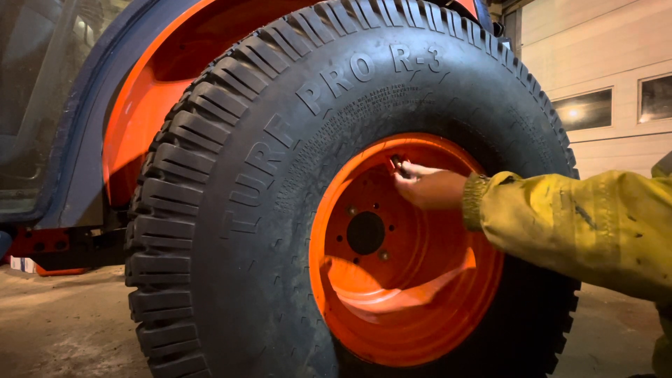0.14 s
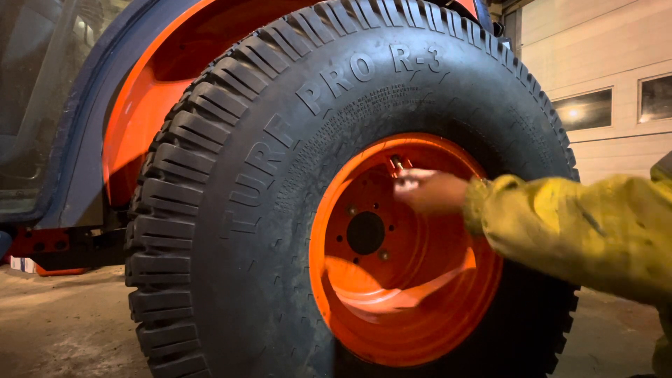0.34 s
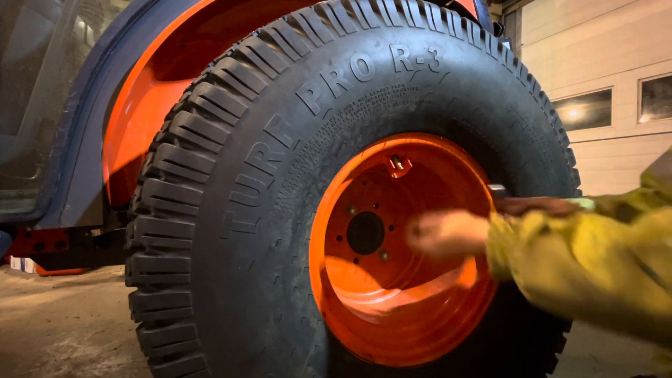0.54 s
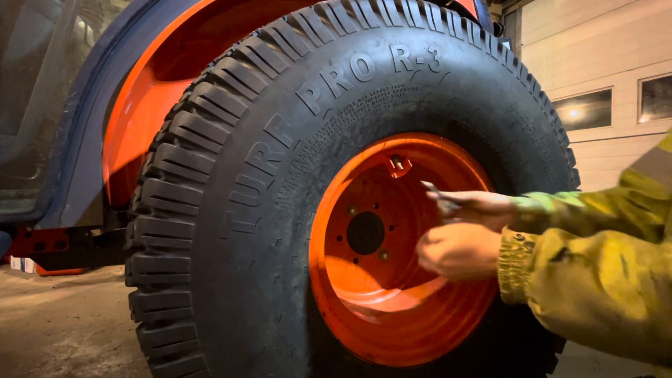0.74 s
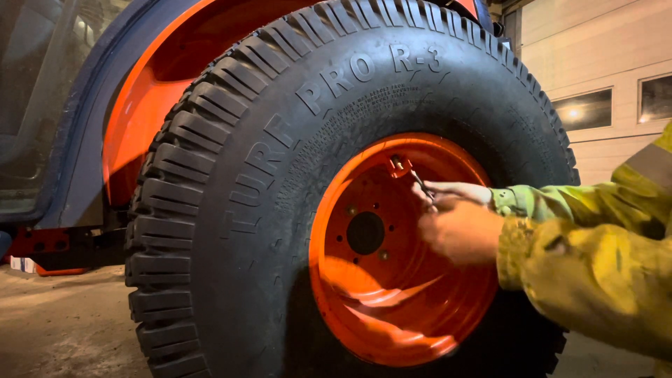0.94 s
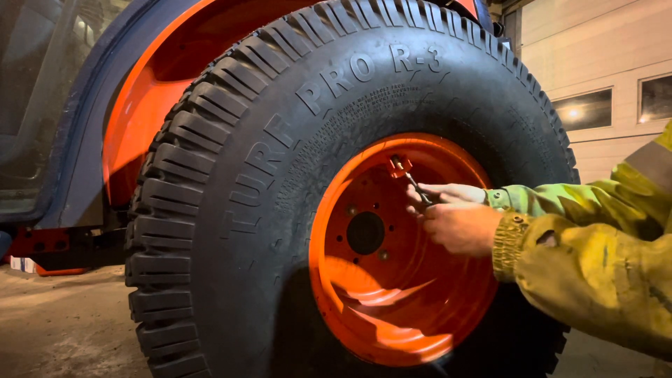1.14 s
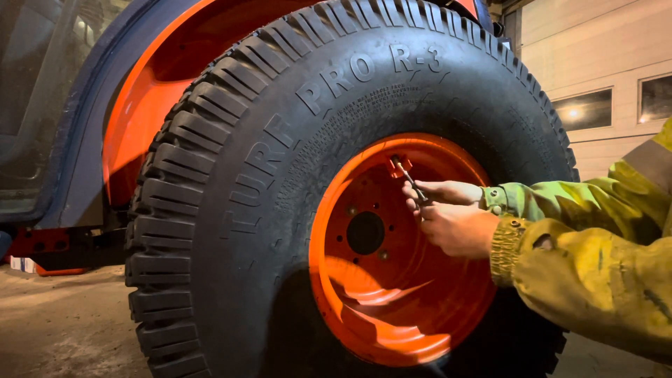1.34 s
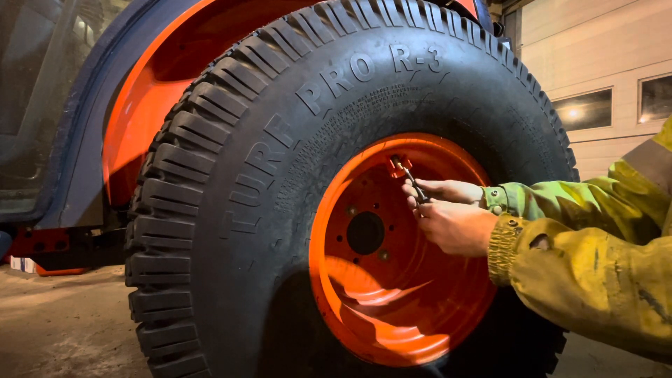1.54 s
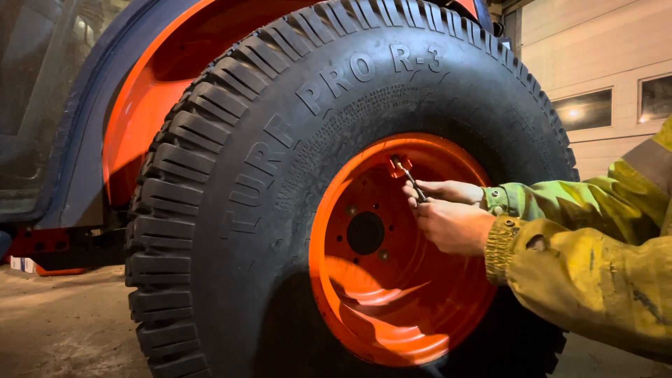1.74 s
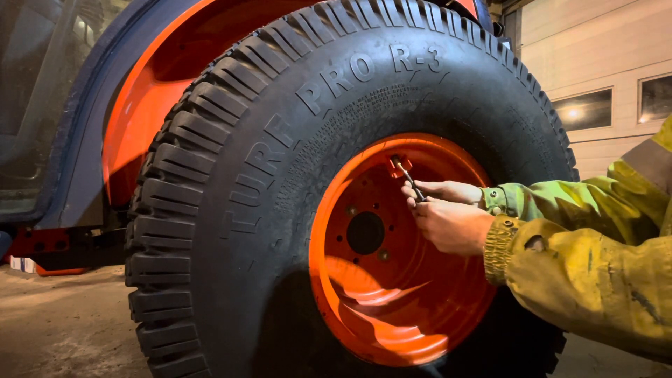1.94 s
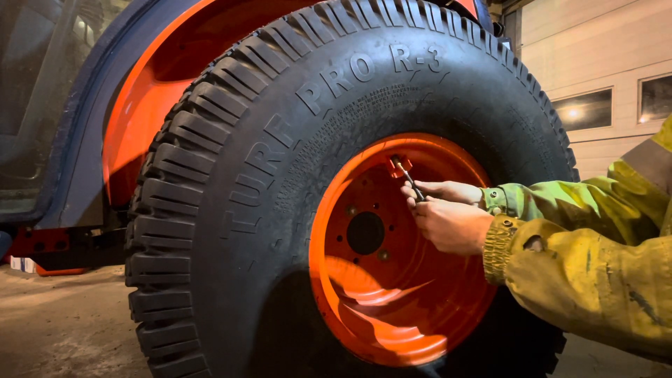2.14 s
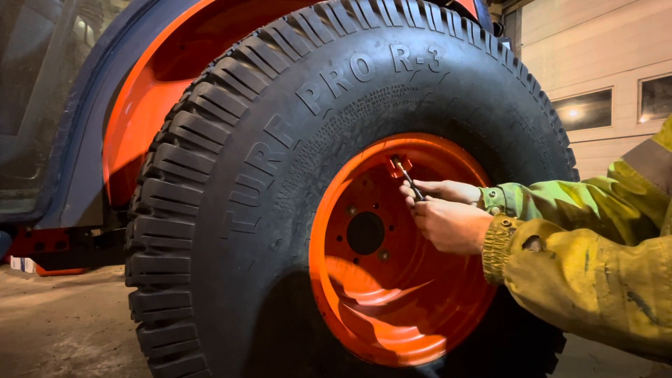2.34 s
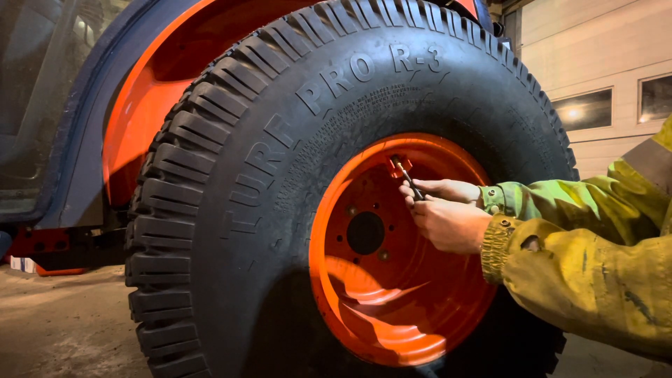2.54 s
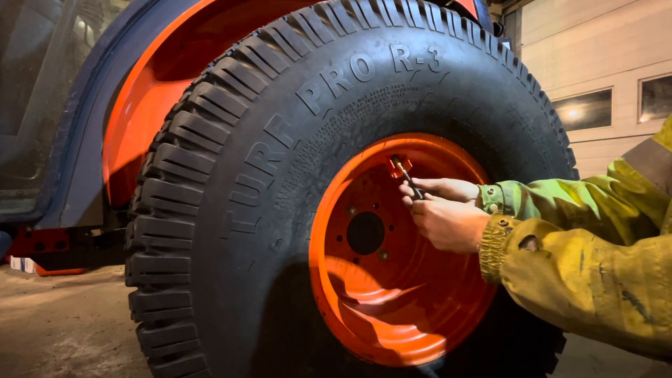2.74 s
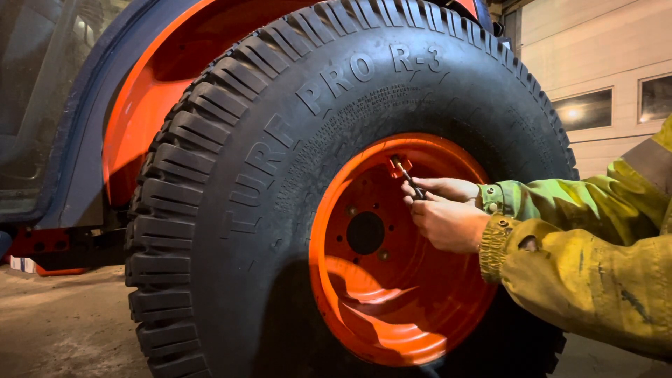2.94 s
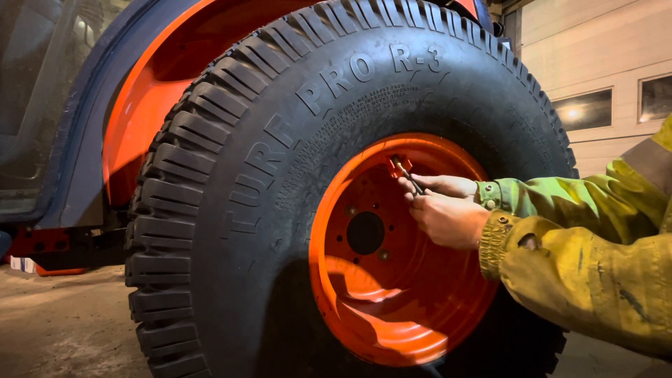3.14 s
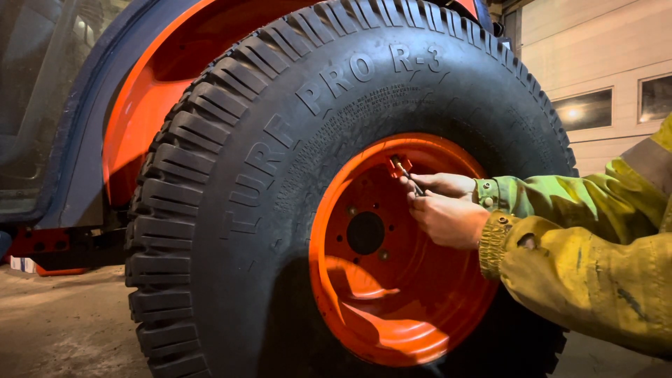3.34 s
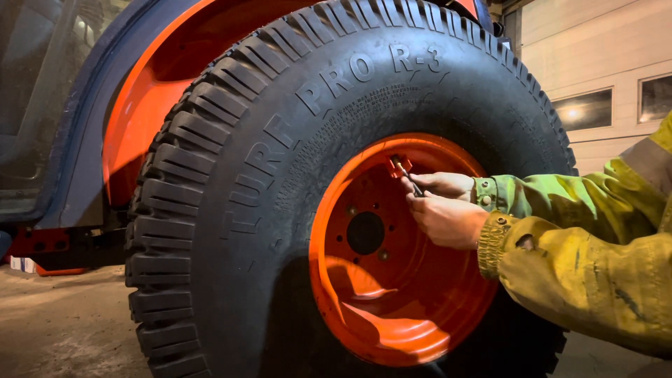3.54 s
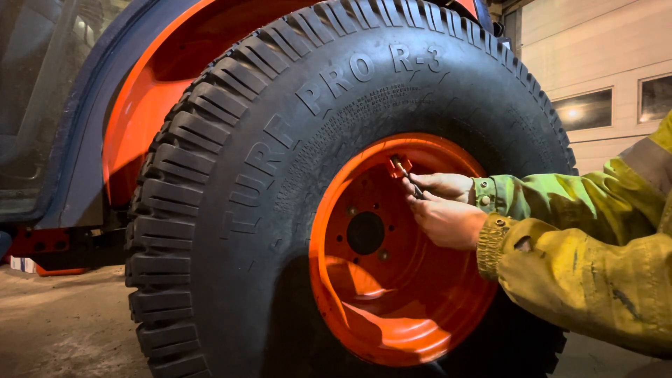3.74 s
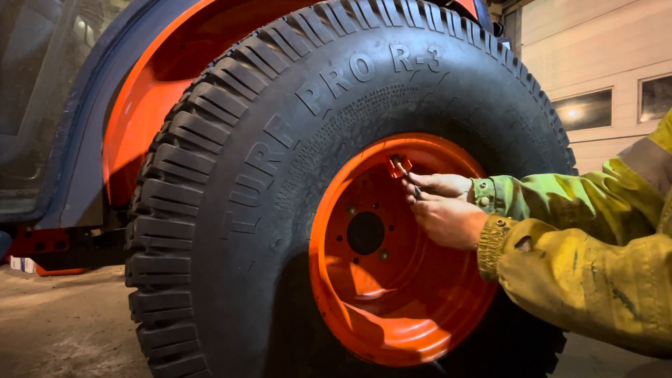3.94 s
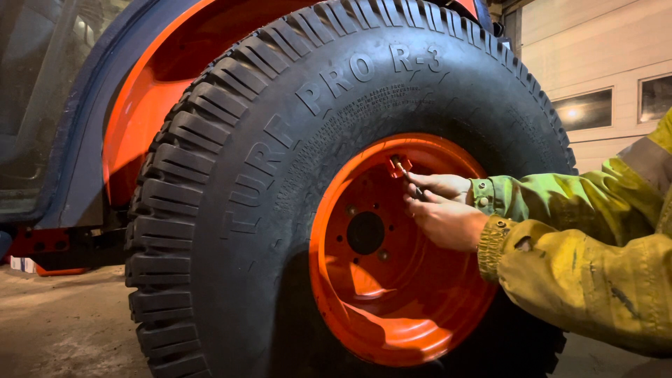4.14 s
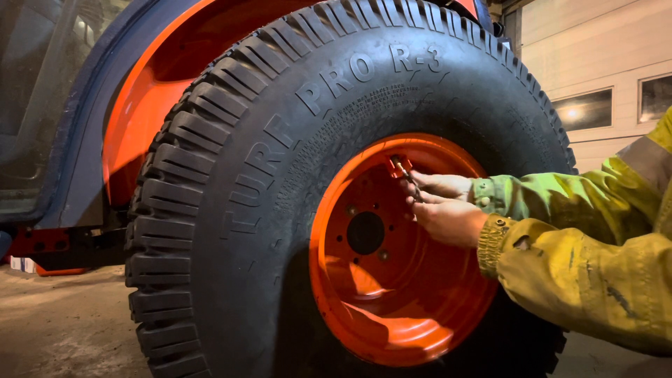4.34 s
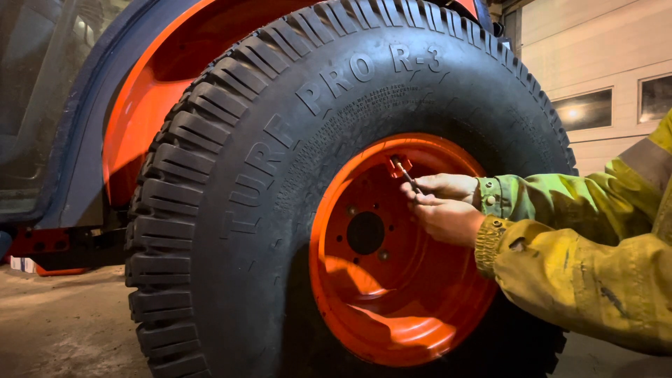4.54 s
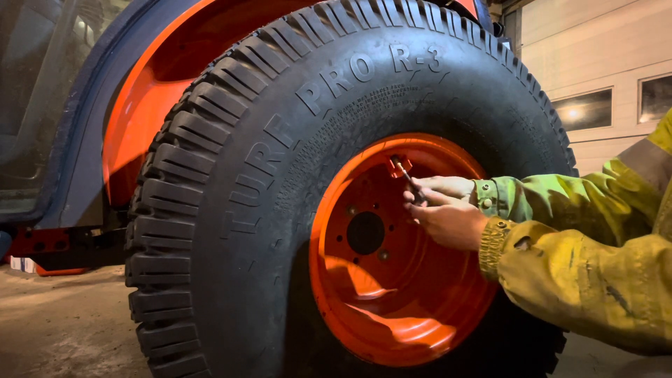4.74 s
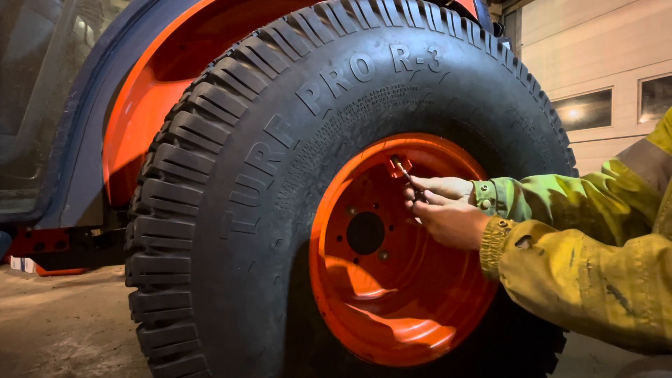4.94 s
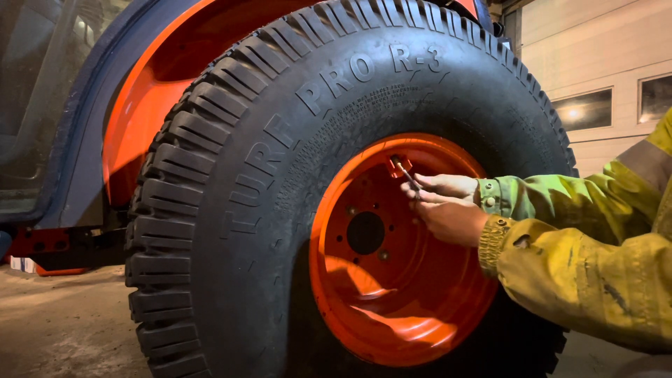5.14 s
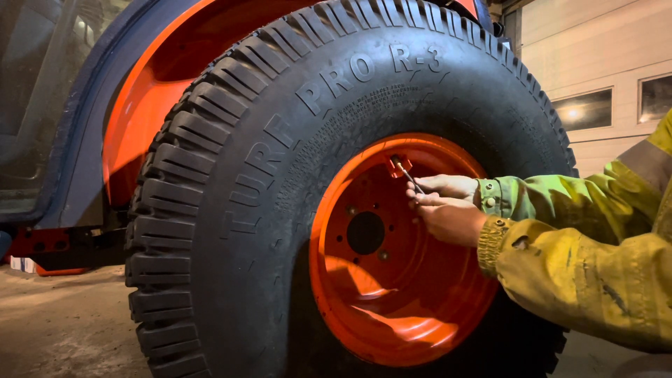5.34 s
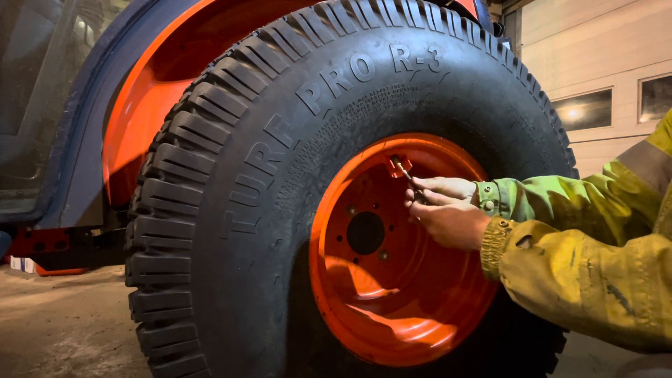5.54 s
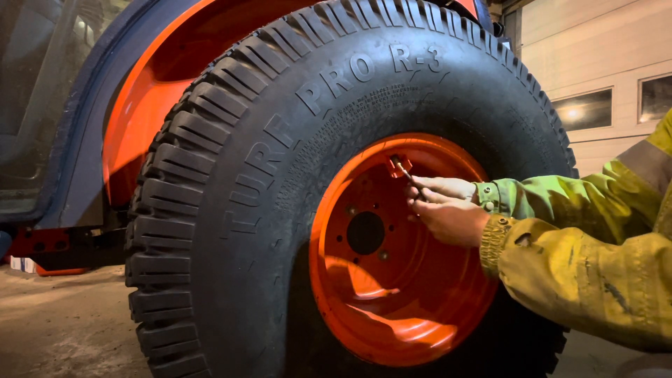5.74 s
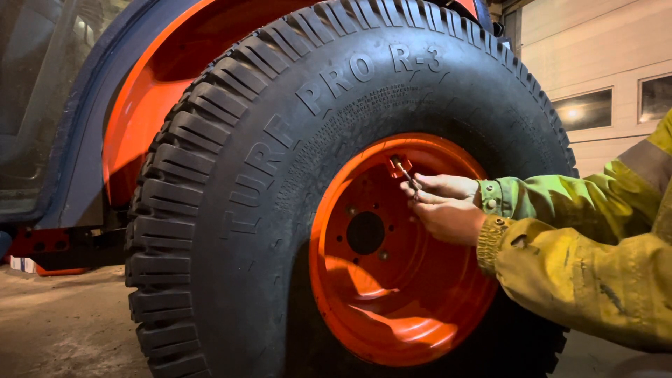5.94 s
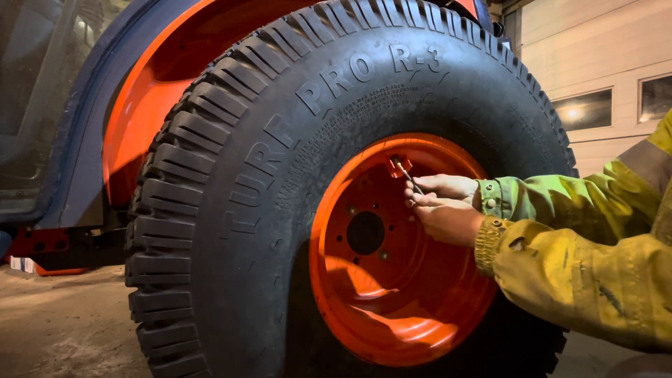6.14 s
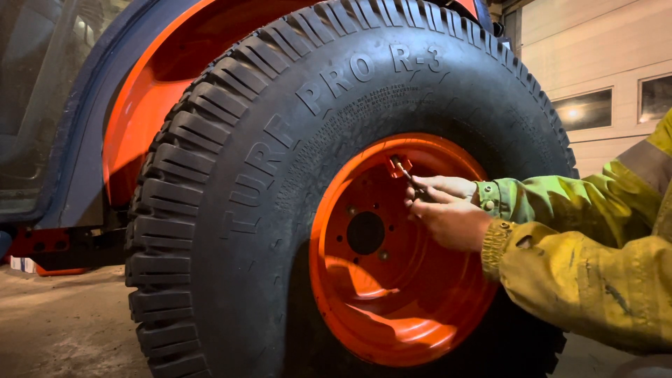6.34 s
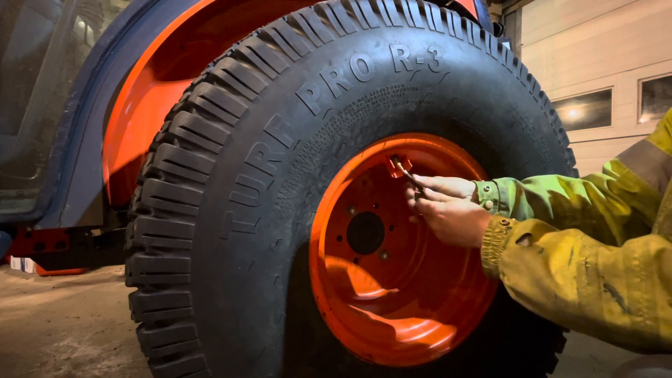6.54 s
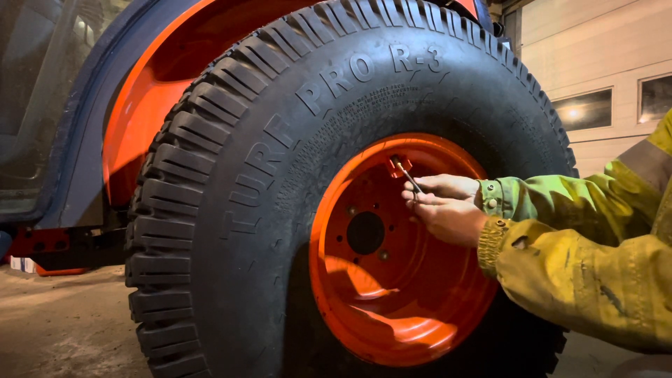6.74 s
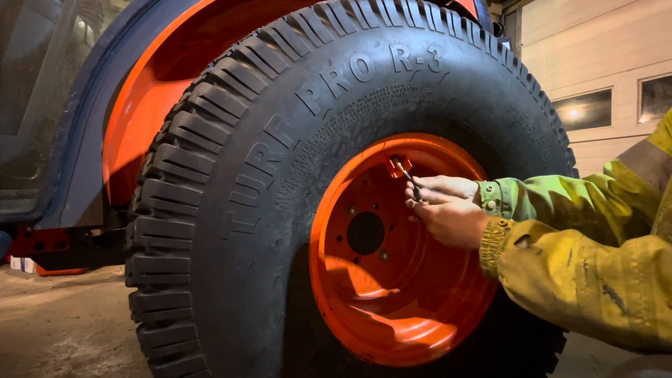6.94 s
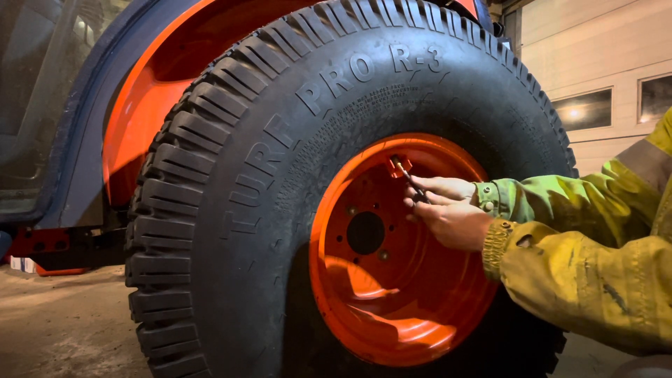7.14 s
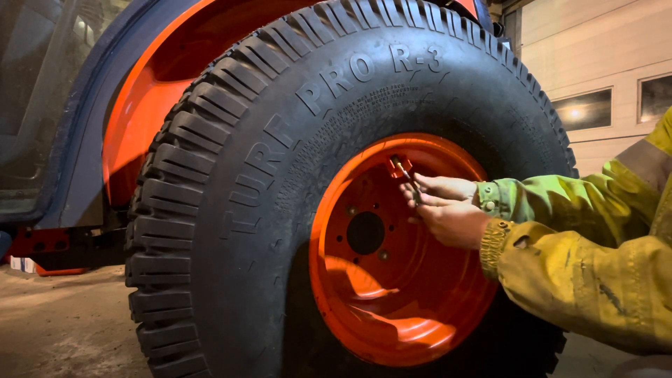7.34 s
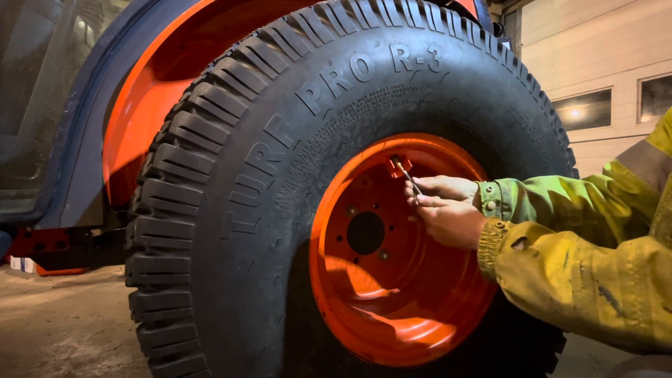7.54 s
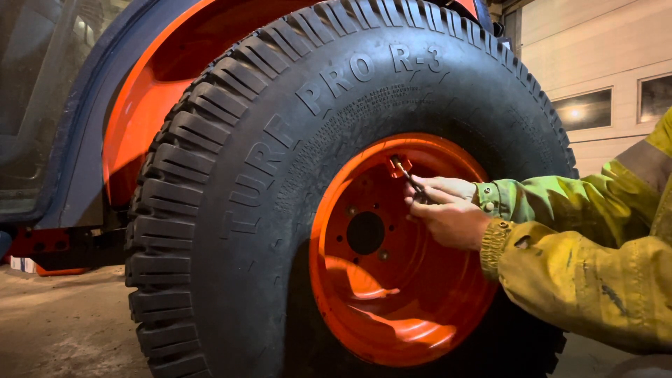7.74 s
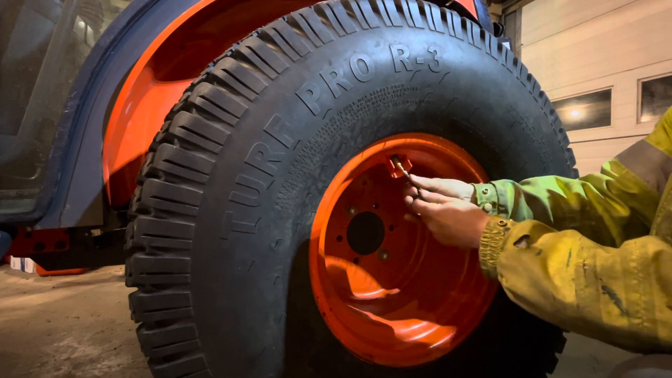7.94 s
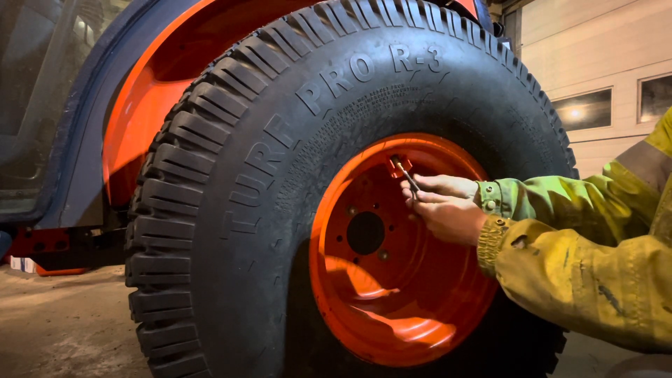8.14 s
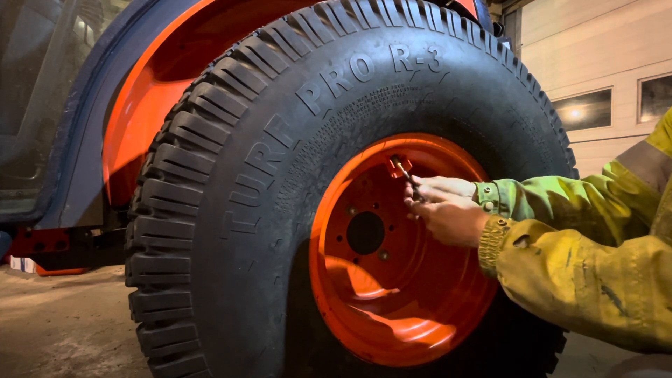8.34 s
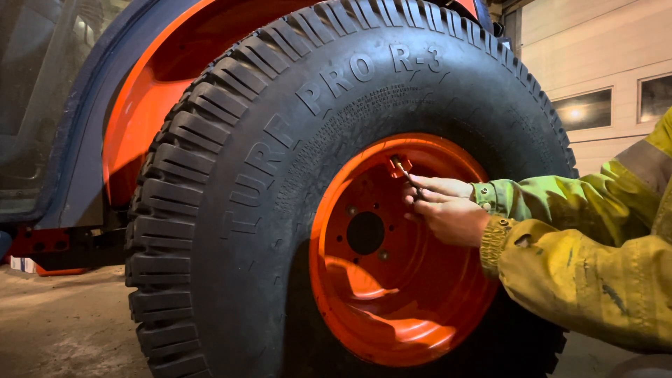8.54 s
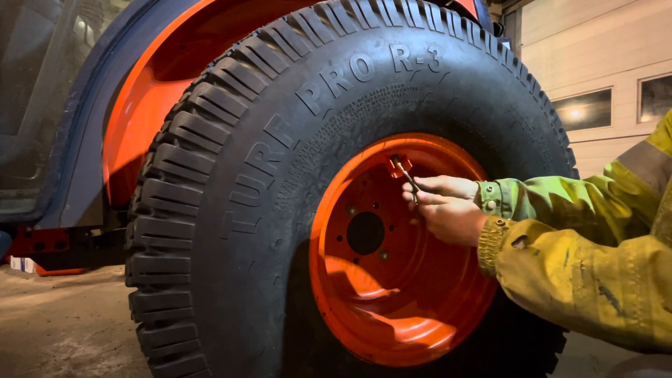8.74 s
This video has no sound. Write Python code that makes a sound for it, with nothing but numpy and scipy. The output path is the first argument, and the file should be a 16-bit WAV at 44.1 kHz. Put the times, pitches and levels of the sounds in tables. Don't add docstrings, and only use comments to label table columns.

```python
import sys
import numpy as np
from scipy import signal
from scipy.fft import rfft, irfft
from scipy.io import wavfile
from scipy.ndimage import uniform_filter1d

SR = 44100
rng = np.random.default_rng(int(sys.argv[2]) if len(sys.argv) > 2 else 0)


def volts_from_db(level):
    exponent = np.asarray(level, float) / 20
    return 10 ** exponent


def waveform_to_disk(signal):
    frames = np.transpose(np.atleast_2d(signal))
    scaled = np.clip(frames, -1, 1) * 32767
    samples = np.round(scaled).astype(np.int16)
    wavfile.write(sys.argv[1], SR, samples)


N = 391608
SECONDS = np.arange(N) / SR


def evened(x):
    return x / np.sqrt(np.mean(x ** 2) + 1e-20)


def read(points, hz):
    f, value = np.transpose(points)
    return np.interp(np.log(hz + 1), np.log(f + 1), value)


def band(x, lo_hz, hi_hz):
    hz = np.fft.rfftfreq(N, 1 / SR) + 1
    mask = 1 / np.sqrt((1 + (lo_hz / hz) ** 16) * (1 + (hz / hi_hz) ** 16))
    out = irfft(rfft(x) * mask, N)
    return out / np.sqrt(np.mean(out.mean(0) ** 2))


def noise(colour_db, same, lead, sideways_db, patchy_db, size):
    frames, bins = 4 * N // size + 5, size // 2 + 1
    a, b, c, d, patches = rng.standard_normal((frames, bins, 5)).T
    patches = uniform_filter1d(patches, bins // 30, axis=0)
    patches = evened(uniform_filter1d(patches, 12, axis=1))
    same = np.clip(same, -1, 1)[:, None]
    left = a + 1j * b
    right = same * left + np.sqrt(1 - same ** 2) * (c + 1j * d)
    right = right * np.exp(-1j * lead)[:, None]
    tilt = volts_from_db(sideways_db / 2)[:, None]
    z = np.array([left * tilt, right / tilt])
    z *= volts_from_db(colour_db[:, None] + patchy_db * patches)
    return signal.istft(z, nperseg=size, noverlap=3 * size // 4)[1][:, :N]


LAYER_EDGES_HZ = [7200, 3800, 1300]
# f/Hz, level/dB (per Hz)
JET_COLOUR = [(170, -17), (225, -30.5), (260, -8), (1200, -12.5), (1600, -6.5), (3200, -4), (5000, -8.5),
              (6300, -2.5), (8500, 0), (10500, 3), (12800, -3.5), (15500, -0.5), (15730, 10.5),
              (15850, -61)]
# f/Hz, width/Hz, level/dB
DISH = [(296, 12, -7.5), (628, 25, 2.0), (887, 41, 3.0), (1231, 36, 3), (1579, 116, -2.5),
        (2028, 110, -3.0), (2388, 68, -0.5), (2740, 190, -3.5), (3490, 20, -12), (3980, 41, -0.5),
        (4402, 60, 0), (4786, 37, 0.0), (5190, 120, -2), (5620, 73, 4.5), (6120, 49, -0.5),
        (6500, 84, -2.5), (6850, 21, -1.5), (7600, 48, -0.5), (8160, 90, -1.0), (8465, 56, 0.5),
        (8980, 48, -1.0), (9770, 39, -1.5), (10930, 47, -13.5)]
# f/Hz, likeness (0-1)
JET_SAME = [(150, 4.1), (280, 0.95), (600, 0.67), (1800, 0.81), (3300, 0.62), (4150, 0.33), (5000, 1),
            (5600, 0.6), (6200, 0.4), (9000, .5), (10400, 0.7)]
# f/Hz, lead/rad
JET_LEAD = [(4900, 0.), (5600, -2.5), (6600, -1.27), (8000, 0.96), (9150, 1.5), (9800, 1.7)]
# f/Hz, level/dB
JET_SIDEWAYS = [(150, 3), (280, -4.5), (600, -0.5), (2000, 0.1), (5000, 4.5), (7300, 1), (8300, -0.5),
                (9300, -10.5), (10600, -1)]
# f/Hz, likeness (0-1), lead/rad
JET_TOP = [(11000, .96, 0), (12700, .95, 0), (13300, .4, -1.5), (13900, .975, -np.pi),
           (15100, .975, -np.pi), (15500, .93, -np.pi), (15800, .93, -np.pi)]
HOLLOW_HZ = (1520, 1630)


def jet():
    hz = np.fft.rfftfreq(1024, 1 / SR)
    dish_db = sum((db + 10) / (1 + (2 * (hz - f) / w) ** 2) for f, w, db in DISH)
    same = read(JET_SAME + [(f, likeness) for f, likeness, _ in JET_TOP], hz)
    same += 0.034 * (dish_db - 5) * (hz < 10000)
    lead = read(JET_LEAD + [(f, angle) for f, _, angle in JET_TOP], hz)
    sideways_db = read(JET_SIDEWAYS + [(JET_TOP[0][0], 0)], hz)
    colour_db = read(JET_COLOUR, hz) + dish_db
    air = noise(colour_db, same, lead, sideways_db, patchy_db=0.96, size=1024)

    flutter_db = 0.25 * evened(uniform_filter1d(rng.standard_normal((4, N)), 300, axis=1))
    *gains, hollow = airflow()
    out = hollow * band(air, *HOLLOW_HZ)
    edges = [SR / 2, *LAYER_EDGES_HZ, 1]
    for gain, flutter, hi, lo in zip(gains, flutter_db, edges, edges[1:]):
        out += gain * volts_from_db(flutter) * band(air, lo, hi)
    opened = np.clip((SECONDS - 2.958) / 0.0063, 0, 1)
    return opened * out


def holds(t, start, length, db, sag_db):
    rise_s, release_db_per_s = 0.041, 199
    since = t[:, None] - start
    level_db = db + sag_db * np.clip(since / length, 0, 1)
    level_db = level_db - release_db_per_s * np.maximum(since - length, 0)
    return (np.clip(since / rise_s, 0, 1) * volts_from_db(level_db) ** 2).sum(1)


# t/s, level/dB
FLOW = [(2.95, -32.5), (3.17, -31.5), (3.3, -35.5), (3.5, -34.5), (3.67, -32.5), (3.85, -33), (3.98, -32.5),
        (4.64, -32), (4.71, -30.5), (5.15, -30.5), (5.35, -32), (5.5, -28.5), (5.95, -31.5), (6.05, -32.5),
        (7.12, -33), (7.45, -31.5), (7.7, -33), (8.88, -31.5)]
OPEN_LAG_S = [0, .004, .012, .014]
SHARE_DB = [-0.5, -9, -15.5, -21]
# middle t/s, length t/s, loss level/dB
PINCHES = [(5.092, 0.046, -3), (5.843, 0.067, -10), (5.895, 0.043, -3.5), (6.033, 0.085, -2.5),
           (6.597, 0.077, -5.5), (7.352, 0.077, -14.5), (8.061, 0.065, -2.5), (8.2, 0.029, -0.5),
           (8.282, 0.063, -2.5), (8.42, 0.035, -2), (8.773, 0.046, -4), (8.885, 0.074, -9)]
PINCH_DEPTH = [1.07, 0.69, 1.24, 1.25]
# start t/s, length t/s, on tool level/dB, on fingers level/dB, sag/dB
STRIKES = [(2.979, 0.53, -31.5, -39.5, -9.5), (3.53, 0.12, -49, -38, -22), (3.712, 0.14, -52, -45.5, 2),
           (3.85, 0.061, -43, -48.5, -3), (3.912, 0.087, -65, -43, -4), (4.244, 0.14, -68, -48.5, 7),
           (4.343, 0.1, -39.5, -56, 3), (4.434, 0.12, -38, -46.5, -11), (4.596, 0.077, -52, -42, 0),
           (4.694, 0.057, -35, -51, -7), (5.0, 0.065, -44, -47.5, 0), (5.109, 0.26, -37, -43.5, -5),
           (5.377, 0.065, -33, -44, -1.5), (5.747, 0.044, -50, -47.5, -1.5), (5.887, 0.058, -42, -54, -2),
           (6.152, 0.15, -42.5, -55, -1), (6.402, 0.19, -61, -59.5, 22.5), (6.972, 0.27, -37.5, -49.5, -13),
           (7.493, 0.24, -38.5, -49, -5), (7.73, 0.15, -36, -52, -8.5), (8.324, .12, -42, -49.5, -2.5),
           (8.467, .15, -44.5, -50.5, 0), (8.68, 0.044, -37.5, -47.5, -1), (8.799, 0.046, -50, -43.5, -3)]
# start t/s, length t/s, level/dB, sag/dB
WHISTLES = [(3.03, 0.16, -43.5, 7.5), (4.07, 0.2, -45, -6), (4.684, .36, -65, -2.5),
            (5.11, 0.066, -35.5, -1), (5.42, 0.15, -45, 2), (5.555, 0.227, -39, 2),
            (6.14, 0.14, -39.5, 4.5), (6.265, 0.36, -38.5, -3.5), (7.014, 0.12, -26, -5),
            (7.15, 0.095, -35, 0), (7.392, 1, -36, -16), (8.195, 0.087, -39, 1), (8.327, 0.024, -31.5, 0),
            (8.458, .14, -37.5, -5)]
# start t/s, length t/s, level/dB, sag/dB
HOLLOW = [
    (3.013, 0.53, -40.5, -8.5),
    (4.605, 0.1, -50, -4),
    (5.123, 0.23, -60, -3),
    (7.487, .35, -53.5, -12),
]


def airflow():
    open_s, open_db_per_s = 2.996, 612
    shade = 0.4
    finger_sag = 0.47
    t = np.arange(0, N / SR, .002)
    start, length, tool_db, finger_db, sag_db = np.transpose(STRIKES)
    whistle = holds(t, *np.transpose(WHISTLES))
    on_tool = holds(t, start, length, tool_db, sag_db)
    on_fingers = holds(t, start, length, finger_db, finger_sag * sag_db)
    struck = np.array([0 * t, whistle, on_tool, on_fingers])

    free = volts_from_db(np.interp(t, *np.transpose(FLOW)) + np.c_[SHARE_DB])
    free[0] /= np.sqrt(1 + shade * (whistle + on_tool) / free[0] ** 2)
    pinch_db = sum(db * np.exp(-abs(2 * (t - s) / w) ** 6.7) for s, w, db in PINCHES)
    loss_db = np.c_[PINCH_DEPTH] * pinch_db
    loss_db -= open_db_per_s * np.maximum(open_s + np.c_[OPEN_LAG_S] - t, 0)
    layers = np.sqrt(free ** 2 + struck) * volts_from_db(loss_db)
    hollow = np.sqrt(holds(t, *np.transpose(HOLLOW)))
    return [np.interp(SECONDS, t, gain) for gain in [*layers, hollow]]


def grit_band(grit, lo_hz, hi_hz):
    return signal.sosfilt(signal.butter(3, [lo_hz, hi_hz], "band", fs=SR, output="sos"), grit)


# f/Hz, level/dB, time to fall 60 dB t/s
RIM = [(397, -6.5, 0.078), (1010, -15, 0.1), (1124, 1.5, 0.04), (1364, 4.5, 0.031), (1640, -6, 0.21),
       (1700, -2.5, 0.16), (2090, -5, 0.2), (2120, -16, 0.12), (3080, -26, 0.052)]


def tap(blow_db, scrape_db, thud_db, ring_db, upper_db, side_db, chance):
    t = np.arange(SR // 3) / SR
    ring = 0
    for (f, db, t60), luck in zip(RIM, chance):
        tone_db = db + upper_db * (f > 1900) + 2.2 * luck
        ring = ring + volts_from_db(tone_db - 60 * t / t60) * np.sin(2 * np.pi * f * t)
    ring *= volts_from_db(ring_db) * (1 - np.exp(-t / 0.0032))
    grit = rng.standard_normal(len(t)) + .5 * rng.standard_normal((2, len(t)))
    grit *= 1 - np.exp(-t / 0.00093)
    knock = grit_band(grit * volts_from_db(7 - 60 * t / 0.049), 760, 2000)
    thud = grit_band(grit * volts_from_db(thud_db + 13.5 - 60 * t / 0.1), 220, 470)
    scrape = grit_band(grit * volts_from_db(scrape_db + 12.5 - 60 * t / 0.05), 2440, 3570)
    scrape += grit_band(grit * volts_from_db(scrape_db + 5 - 60 * t / 0.077), 4600, 6000)
    sides = volts_from_db(np.array([[side_db / 2], [-side_db / 2]]))
    return volts_from_db(blow_db - 7) * (ring + knock + thud + scrape) * sides


# t/s, blow level/dB, scrape/dB and ring/dB against the blow, left over right/dB
KNOCKS = [
    (0.119, -58, -7, -16, 4),
    (0.621, -59, -11, -18, 0.1),
    (0.937, -33.5, -30, -16, 2),
    (2.337, -36, -29, -8, -3),
    (2.566, -46.5, -22, -10, 7),
    (2.945, -58, -26, 3, 1.5),
]
# t/s, blow level/dB, scrape/dB and upper ring/dB against the blow, left over right/dB
TICKS = [(1.408, -37.5, -34, -2, 7), (1.497, -36.5, -19, 6, 5), (1.526, -46.5, -9.5, 10, 11),
         (1.544, -42, -23, -4, 2), (1.692, -51, -20, 8.5, 8), (1.715, -52, -19, -2, 2.5),
         (1.829, -32.5, -18.5, 13.5, 5.5), (2.029, -49, -30, 2, 11), (2.109, -44.5, -32, 3, 6),
         (2.162, -36, -25, 5.5, 4), (2.255, -51, -16, 1.5, 11), (2.324, -42, -15, -15, 11),
         (2.367, -48, -23, -7, 9)]


def taps():
    out = np.zeros((2, N + SR))
    rows = [(s, db, scrape, -0.5, ring, 0, side) for s, db, scrape, ring, side in KNOCKS]
    for s, db, scrape, upper, side in TICKS:
        thud_db = -62 - db + 0.42 * (db + 45)
        rows.append((s, db, scrape, thud_db, -5, upper, side))
    for (s, *row), chance in zip(rows, rng.standard_normal((len(rows), len(RIM)))):
        sound = tap(*row, chance)
        first = round(s * SR)
        out[:, first:first + sound.shape[1]] += sound
    t = np.arange(SR // 4) / SR
    echo = rng.standard_normal((2, len(t))) * volts_from_db(-60 * t / .12) * (t > .003)
    echo /= np.linalg.norm(echo[0])
    return out[:, :N] + volts_from_db(-5) * signal.fftconvolve(out, echo, axes=1)[:, :N]


# t/s, level/dB, f/Hz, time to fall 60 dB t/s
BUMPS = [
    (.19, -44, 120, 0.086),
    (1.405, -51, 90, 0.071),
    (4.31, -51, 185, .2),
    (4.433, -44, 135, 0.47),
    (7.35, -41, 173, 0.13),
    (7.352, -46, 298, 0.077),
    (7.41, -44, 110, 0.23),
]


def bumps():
    out = np.zeros(N)
    for s, db, hz, t60 in BUMPS:
        t = np.maximum(SECONDS - s, 0)
        out += volts_from_db(db - 60 * t / t60) * (1 - np.exp(-t / 0.0037)) * np.sin(2 * np.pi * hz * t)
    return out


# f/Hz, level/dB (per Hz)
CLOTH = [(150, -30), (250, -3.5), (600, -7.5), (950, -6.5), (2100, -16.5), (2600, -18.5), (7000, -20.5),
         (10200, -19), (13300, -31), (14100, -75)]
# peak t/s, swish level/dB, low rub/dB against the swish, rise in dB/s, fall in dB/s
STROKES = [
    (0.0, -67, 5, 900, 3000),
    (0.12, -71.5, 8, 1502, 110),
    (0.46, -63.5, -2, 96, 60),
    (0.63, -60, 4, 62, 39),
    (0.73, -63, 0.5, 62, 41),
    (1.22, -69, 4, 54, 87),
    (1.5, -82, 17, 80, 108),
    (1.88, -84.5, 20.5, 150, 56),
    (2.25, -83, 18.5, 40, 34),
    (2.66, -76, 0, 41, 300),
]


def sleeve():
    hz = np.fft.rfftfreq(512, 1 / SR)
    cloth = noise(read(CLOTH, hz), 0.12 + 0 * hz, 0 * hz, 0 * hz, patchy_db=2.0, size=512)
    t = np.arange(0, 3, .002)
    s, db, rub_db, rise, fall = np.transpose(STROKES)[:, :, None]
    power = volts_from_db(db - np.maximum(rise * (s - t), fall * (t - s))) ** 2
    rub_power = power * volts_from_db(2 * rub_db)
    swish = np.interp(SECONDS, t, np.sqrt(power.sum(0)))
    rub = np.interp(SECONDS, t, np.sqrt(rub_power.sum(0)))
    moving = np.clip((2.95 - SECONDS) / 0.041, 0, 1)
    return moving * (swish * band(cloth, 2200, 20000) + rub * band(cloth, 100, 2170))


# f/Hz, level/dB (per Hz)
YARD = [(30, -40), (42, -32), (55, 0.5), (70, -7.5), (100, -9), (160, -16.5), (250, -22), (520, -32.5),
        (720, -22), (820, -38.5), (1400, -44.5), (5000, -57), (9500, -49), (13500, -66)]
# f/Hz, likeness (0-1)
YARD_SAME = [(60, 0.89), (180, 0.45), (550, 0), (1650, 0), (4970, 0), (15000, 0.03)]
HUM_HZ = [48.7, 57.9, 95.5]
HUM_STEADY_DB = [-64, -58, -81]
HUM_LOADED_DB = [-50, -54, -59.5]
# t/s, level/dB against full load
LOAD = [
    (0, -26),
    (1.2, -17),
    (2.4, -7),
    (3.4, -7),
    (4.4, -1.5),
    (5.72, 1.5),
    (5.85, -10),
    (8.88, -26),
]


def yard():
    hz = np.fft.rfftfreq(2048, 1 / SR)
    wash = noise(read(YARD, hz), read(YARD_SAME, hz), 0 * hz, 0 * hz - 1.3, patchy_db=1.5, size=2048)
    waver = evened(uniform_filter1d(rng.standard_normal((3, N)), 6000, axis=1))
    turn = 2 * np.pi * np.cumsum(np.c_[HUM_HZ] * (1 + 0.0212 * waver), axis=1) / SR
    load_db = np.interp(SECONDS, *np.transpose(LOAD))
    level = np.hypot(volts_from_db(np.c_[HUM_STEADY_DB]), volts_from_db(np.c_[HUM_LOADED_DB] + load_db))
    level = level * volts_from_db(1.5 * waver[::-1])
    hum = np.sqrt(2) * (level * np.sin(turn)).sum(0)
    return volts_from_db(-56.5) * evened(wash) + hum * volts_from_db(np.array([[-.7], [.7]]))


def scene():
    return jet() + taps() + bumps() + sleeve() + yard()


def roll_off(x):
    return signal.sosfilt(signal.butter(12, 15920, fs=SR, output="sos"), x)


def record(dry):
    return roll_off(dry)


dry = scene()
out = record(dry)
waveform_to_disk(out)
```